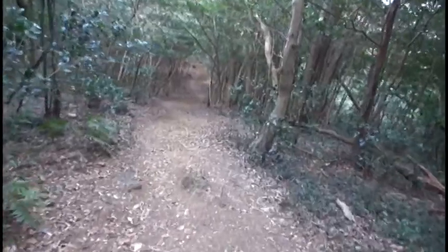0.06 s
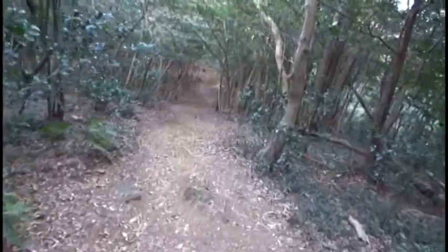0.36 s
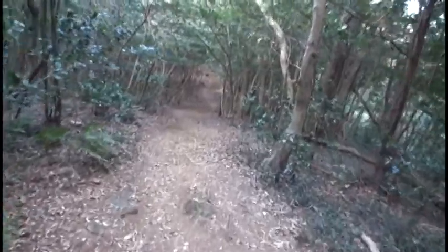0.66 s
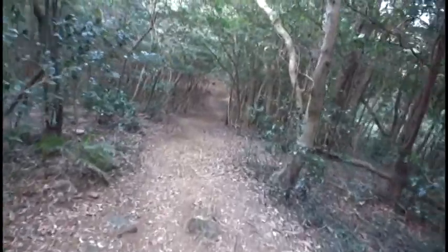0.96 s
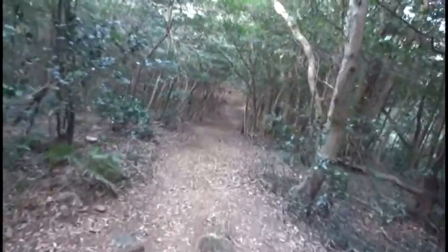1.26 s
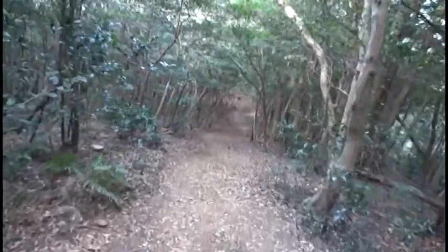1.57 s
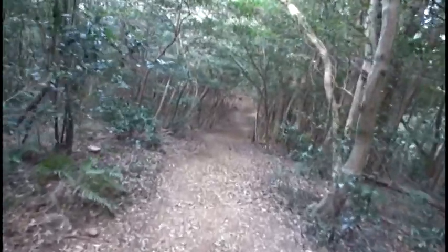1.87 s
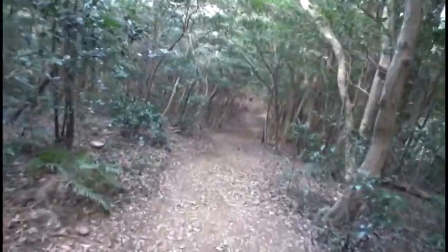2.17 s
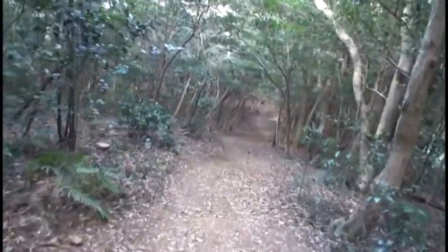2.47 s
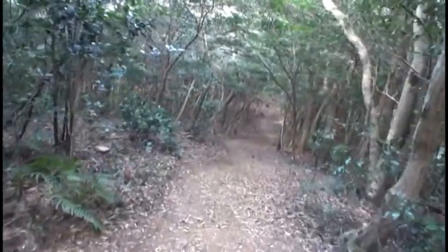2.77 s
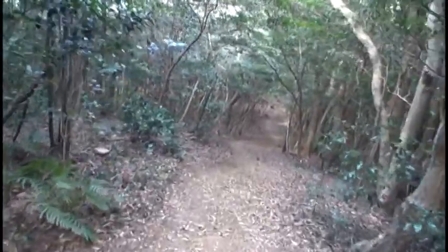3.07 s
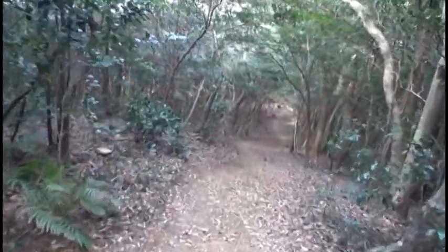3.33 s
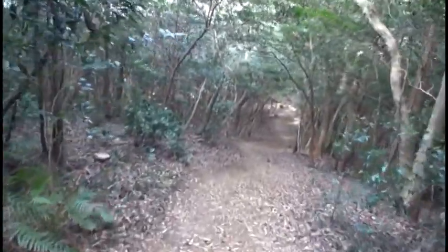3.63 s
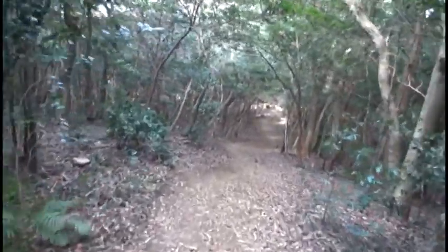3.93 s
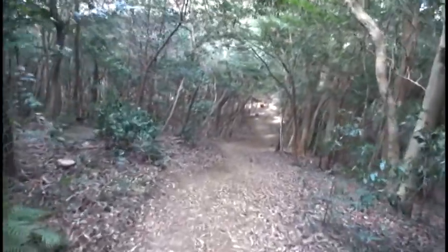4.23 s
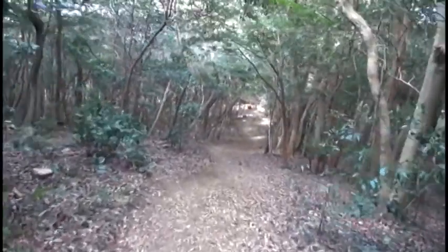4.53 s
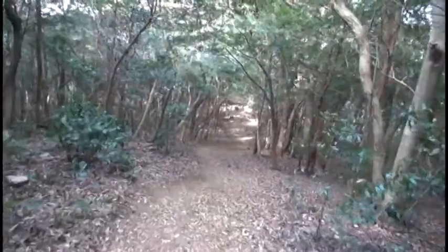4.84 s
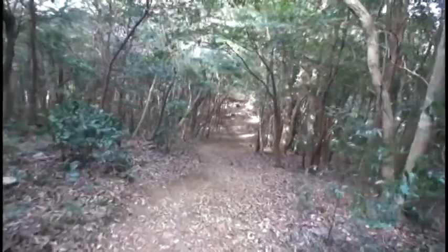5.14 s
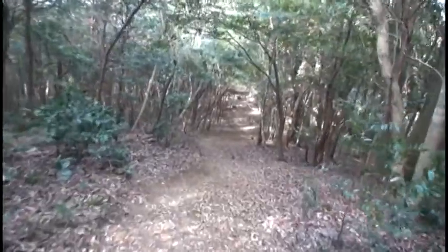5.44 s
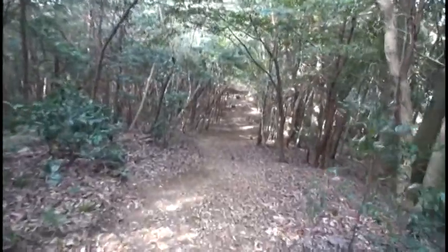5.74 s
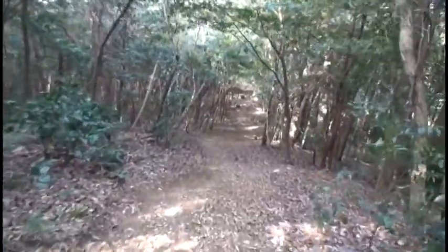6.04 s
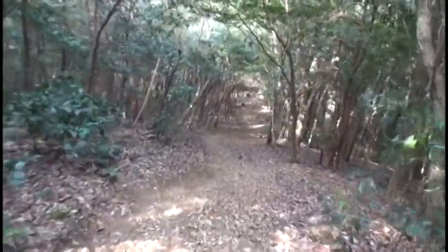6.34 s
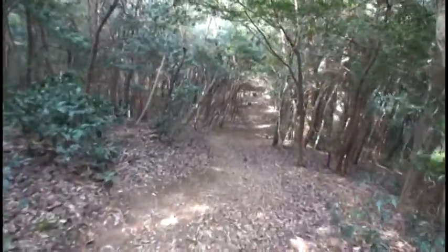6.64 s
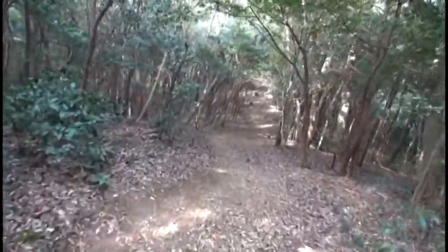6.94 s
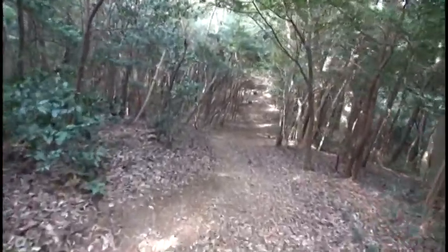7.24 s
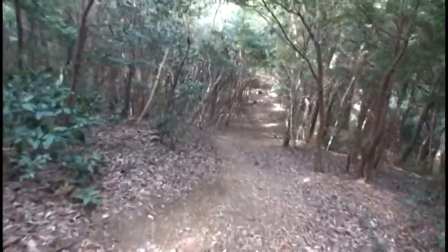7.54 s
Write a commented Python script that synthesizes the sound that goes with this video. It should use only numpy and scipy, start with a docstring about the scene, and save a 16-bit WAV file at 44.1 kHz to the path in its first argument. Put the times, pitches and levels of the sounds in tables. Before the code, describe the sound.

From the start, a breeze hisses through a forest, with rushing treetops and lightly fluttering leaves. Right away someone walks along a dirt trail at about two steps a second, and keeps going to the end, at around 7.5 seconds. Each step is a soft heel thud on packed earth with a short crunch of dry leaves, some heavier than others, with an occasional light scuff between them. Twigs and stiff leaves snap sharply underfoot throughout, loudest near 1.2, 2.1 and 4 seconds, with another clear crack near 5.1. The breeze gradually swells until about 5 seconds, then eases a little. The sound is close and dry, picked up by a small handheld camera that adds a very faint low hum and high whine. There are slight dull handling bumps near 1.7 and 2.2 seconds, and a few thin, high ticks.

```python
"""From the start, a breeze hisses in the trees and a small handheld camera hums and whines faintly.
Right away someone walks along a dirt trail, two steps a second: each heel thuds softly on the earth
as the sole crunches dry leaves. Twigs snap underfoot, loudest near 1, 2 and 4 seconds.
The breeze swells until about 5 seconds, then eases as the walk goes on."""
import sys
import numpy as np
from scipy.fft import rfft, irfft, next_fast_len
from scipy.io import wavfile
from scipy.ndimage import map_coordinates

SR = 44100
rng = np.random.default_rng(int(sys.argv[2]) if len(sys.argv) > 2 else 0)


def unload_audio(sound):
    """Save the sound as a 16-bit wav file, at the path given as the first command line argument."""
    columns = np.transpose(np.atleast_2d(sound))
    # keep every value between -1 and 1, then stretch to whole-number steps
    steps = np.round(np.clip(columns, -1, 1) * 32767)
    wavfile.write(sys.argv[1], SR, steps.astype(np.int16))


N = 335160  # 7.6 seconds

# tone of the faint, steady background hiss: frequency_hz, relative_db
HISS_TONE = [(25, -11.5), (60, 3), (290, 0), (700, -16.5), (1200, -14), (1700, 1.5), (5200, 2),
             (6200, -4.5), (8200, -10), (9700, -29.5)]
# the camera's hum and whine: pitch_hz, level_db
CAMERA_TONES = [(59.9, -64.5), (119.8, -69.5), (8152, -75.5)]
# the hand bumping the camera: start_s, level_db, pitch_hz
HAND_BUMPS = [(1.705, -41, 175), (2.195, -44, 208)]
# thin, high ticks: time_s, level_db, pitch_hz
HIGH_TICKS = [(0.6465, -43.5, 7000), (1.7115, -36, 6880), (5.085, -32, 5350)]
# strength of the breeze: time_s, level_db
BREEZE_STRENGTH = [(0.0, -43.5), (0.55, -43), (1.6, -39.5), (2.3, -38), (3.24, -38), (3.87, -38.5),
                   (4.36, -37), (5.19, -34.5), (6.39, -37), (7.17, -39.5), (7.6, -38.5)]
# tone of the rushing treetops: frequency_hz, relative_db
TREETOP_TONE = [(20, -40.5), (45, -27), (90, -16.5), (200, -12), (330, -4.5), (650, -0.5), (1100, 0.5),
                (1800, -3), (2700, -5), (3800, -15), (5500, -26), (9000, -54.5)]
# tone of the fluttering leaves: frequency_hz, relative_db
FLUTTER_TONE = [(900, -24), (1700, -1), (2600, 2.5), (4100, 0.5), (4650, -3.5), (5400, -5.5), (5900, -10.5),
                (6700, -11.5), (7200, -18), (8000, -22.5), (8400, -27.5), (9100, -34.5), (9800, -51)]
# twigs and stiff leaves breaking: time_s, level_db, pitch_hz, ring_cycles
TWIG_SNAPS = [(0.119, -19.3, 1050, 0.27), (0.123, -22, 1310, 0.35), (0.354, -23, 900, 0.31),
              (0.53, -15, 1450, 0.27), (0.583, -21, 1900, 0.4), (0.591, -20, 1800, 0.49),
              (0.66, -25, 1190, 0.35), (1.153, -6.5, 1260, 0.23), (1.594, -15.5, 1150, 0.2),
              (1.681, -20, 2500, 0.5), (2.11, -13.5, 1050, 0.4), (2.125, -8, 1170, 0.16),
              (2.587, -19, 1090, 0.38), (2.666, -19.5, 1770, 0.28), (3.019, -16, 1160, 0.43),
              (3.164, -15, 950, 0.36), (3.611, -20, 780, 0.31), (3.82, -20, 1800, 0.3),
              (3.987, -6, 1910, 0.33), (3.9925, -15, 2150, 0.55), (4.013, -13, 2100, 0.38),
              (4.147, -13, 1300, 0.6), (4.1545, -11, 1050, 0.33), (4.62, -16, 1100, 0.35),
              (4.675, -18, 1310, 0.35), (4.788, -17, 1200, 0.53), (4.947, -15, 1720, 0.35),
              (5.084, -9.3, 1130, 0.4), (5.5705, -11.5, 680, 0.28), (5.578, -13, 1050, 0.28),
              (5.64, -18, 1100, 0.25), (6.256, -24, 950, 0.35), (6.298, -19, 1640, 0.38),
              (6.487, -21, 1380, 0.35), (6.985, -19, 1290, 0.42), (7.037, -17, 1630, 0.39),
              (7.525, -17, 2400, 0.35), (7.549, -15, 1950, 0.39), (7.569, -16, 1400, 0.45)]
# the swinging foot brushing leaves: start_s, level_db, length_s, brightness_db (splinters over crunch)
FOOT_SCUFFS = [(2.2, -32.5, 0.0093, 0), (2.59, -43.5, 0.06, 4), (2.75, -38.5, 0.069, -12),
               (5.052, -41, 0.014, 2), (5.386, -37, 0.035, -4), (5.516, -38.5, 0.026, 4),
               (6.25, -36.5, 0.037, -12), (7.535, -42, 0.035, -1)]
# footfalls: start_s, weight_db, roll_s (how long the sole takes to roll over the leaves)
FOOTFALLS = [(0.11, -1, 0.027), (0.5, -1.5, 0.073), (1.035, 0, 0.031), (1.572, -4, 0.028),
             (2.09, -2.5, 0.066), (2.56, -2.5, 0.068), (3.0, 1, 0.04), (3.585, -3.5, 0.037),
             (4.11, -0.5, 0.11), (4.595, 1, 0.055), (5.05, 0.5, 0.045), (5.55, -0.5, 0.15),
             (5.99, -3, 0.07), (6.47, 3.5, 0.019), (6.965, -9, 0.044), (7.525, -2, 0.029)]
# tone of packed earth under a heel: frequency_hz, relative_db
EARTH_TONE = [(40, -25.0), (120, -9.5), (300, -7.5), (600, 1), (1500, -14.5), (5000, -64.5)]

TREETOP_DB, TREETOP_GROWTH = -33, 0.53  # level in an average breeze; dB gained per dB of breeze
FLUTTER_DB, TAPPING_DB = 1, -8  # leaves in the trees, added to the breeze's strength
CRUNCH_DB, THUD_DB, HEEL_S = -36.5, -48, 0.047  # each step adds its weight to both levels
SPLINTER_DB = -5  # compared with a step's crunch
FIBRE_HZ, TOP_HZ = 2800, 9900  # pitch of tearing twig fibres; the camera's upper limit


def amp(db):
    """Turn decibels into a number to multiply by."""
    return 10 ** (np.asarray(db) / 20)


def unit(x):
    """Scale a sound so its average level (rms) is 1."""
    return x / np.sqrt(np.mean(x ** 2) + 1e-20)


def wobble(per_second):
    """A smooth curve through this many random values a second."""
    values = rng.standard_normal(int(N * per_second / SR) + 4)
    return map_coordinates(values, [np.arange(N) * per_second / SR])


def filtered(x, gain_at):
    """Multiply each frequency in a sound by gain_at(hz)."""
    size = next_fast_len(N + SR // 2)
    return irfft(rfft(x, size) * gain_at(np.fft.rfftfreq(size, 1 / SR)), size)[..., :N]


def cut_bass(x, below_hz):
    """Turn down the low notes: small, light things give off little bass."""
    return filtered(x, lambda hz: hz ** 2 / np.hypot(hz ** 2, below_hz ** 2))


def noise(tone):
    """Steady noise shaped by a tone table, at average level 1."""
    table_hz, db = np.transpose(tone)
    white = rng.standard_normal(N)
    return unit(filtered(white, lambda hz: amp(np.interp(np.log(hz + 1), np.log(table_hz + 1), db))))


def press(start_s, length_s):
    """The push of a touch: it rises to 1 in half its length, then eases off."""
    progress = np.maximum(np.arange(N) / SR - start_s, 0) / (length_s / 2)
    return progress * np.exp(1 - progress)


def cracks(times, gains, hz, cycles):
    """Tiny bursts that swell and die away; more cycles make them ring longer."""
    offsets = np.arange(-512, 512)  # samples around each burst's middle
    turns = hz[:, None] * offsets / SR
    phase = rng.uniform(0, 2 * np.pi, (len(times), 1))
    waves = gains[:, None] * np.cos(2 * np.pi * turns + phase)
    bursts = waves / np.cosh(np.clip(turns / cycles, -20, 20))
    places = np.round(times * SR).astype(int)[:, None] + offsets
    return np.bincount(np.clip(places, 0, N).ravel(), bursts.ravel(), N + 1)[:N]


def crackle(count, pitch_hz, spread, size_db, cycles=0.32):
    """Dry leaves crack at random times: many small cracks and a few big ones."""
    times = rng.uniform(0, N / SR, count)
    sizes = amp(size_db * np.minimum(rng.exponential(1, count), 3))
    pitches = pitch_hz * np.exp(spread * rng.standard_normal(count))
    return unit(cracks(times, sizes, pitches, cycles))


def faint_stereo_hiss():
    """A faint, steady background hiss, different in left and right."""
    return amp(-63.5) * np.array([noise(HISS_TONE), noise(HISS_TONE)])


def camera():
    """The camera hums and whines steadily, and the hand holding it makes dull bumps."""
    t = np.arange(N) / SR
    hum = sum(amp(db) * np.sqrt(2) * np.sin(2 * np.pi * (hz * t + rng.random()))
              for hz, db in CAMERA_TONES)
    bumps = sum(amp(db) * press(start, length_s=0.012) * np.sin(2 * np.pi * hz * (t - start))
                for start, db, hz in HAND_BUMPS)
    return hum + bumps


def ticks():
    """Faint, high ticks, each a few thousandths of a second long."""
    times, db, hz = np.transpose(HIGH_TICKS)
    return cracks(times, amp(db), hz, cycles=5.6)


def breeze():
    """Moving air makes the treetops rush and their leaves flutter and tap each other."""
    times, levels = np.transpose(BREEZE_STRENGTH)
    strength_db = np.interp(np.arange(N) / SR, times, levels)
    gust_db = strength_db - strength_db.mean()
    treetops = amp(TREETOP_DB + TREETOP_GROWTH * gust_db + 0.17 * wobble(7)) * noise(TREETOP_TONE)
    flutter = amp(strength_db + FLUTTER_DB + 0.32 * wobble(11)) * noise(FLUTTER_TONE)
    taps = crackle(count=450, pitch_hz=1680, spread=0.3, size_db=3.5, cycles=0.38)
    return treetops + flutter + amp(strength_db + TAPPING_DB) * taps


def snaps():
    """A twig or stiff leaf breaks under the shoe, its fibres tear, and it springs back weakly."""
    times, db, hz, cycles = np.transpose(TWIG_SNAPS)
    breaks = cracks(times, amp(db), hz, cycles[:, None])
    fibres = cracks(times + 0.0006, amp(db - 16), np.full_like(hz, FIBRE_HZ), cycles=0.5)
    rebounds = cracks(times + 0.0014, amp(db - 13), hz, cycles[:, None])
    return cut_bass(breaks + fibres + rebounds, below_hz=400)


def footsteps():
    """The heel thuds on earth while the sole crushes leaves; a heavier step makes both louder."""
    heel = sum(amp(THUD_DB + db) * press(start, HEEL_S) for start, db, _ in FOOTFALLS)
    thuds = heel * noise(EARTH_TONE)
    sole = sum(amp(CRUNCH_DB + db) * press(start, roll_s) for start, db, roll_s in FOOTFALLS)
    scuffs = sum(amp(db) * press(start, length_s) for start, db, length_s, _ in FOOT_SCUFFS)
    leaves = cut_bass(crackle(count=7000, pitch_hz=1130, spread=0.3, size_db=3.5), below_hz=400)
    crunch = (sole + scuffs) * leaves
    # the driest leaves splinter into smaller, brighter-sounding pieces
    bright_scuffs = sum(amp(db + brightness_db) * press(start, length_s)
                        for start, db, length_s, brightness_db in FOOT_SCUFFS)
    pieces = crackle(count=3000, pitch_hz=2390, spread=0.15, size_db=4.5, cycles=0.45)
    splinters = (amp(SPLINTER_DB) * sole + bright_scuffs) * pieces
    # trodden leaves keep shifting a little, even between steps
    settling = cut_bass(crackle(count=700, pitch_hz=1200, spread=0.3, size_db=3), below_hz=400)
    return thuds + crunch + splinters + amp(-49) * settling


def scene():
    """The trail sounds the same in left and right; only the faint background hiss differs."""
    trail = breeze() + footsteps() + snaps() + ticks() + camera()
    return trail + faint_stereo_hiss()


def record(dry):
    """The camera keeps no sound higher than TOP_HZ."""
    return filtered(dry, lambda hz: hz < TOP_HZ)


dry = scene()
out = record(dry)
unload_audio(out)
```